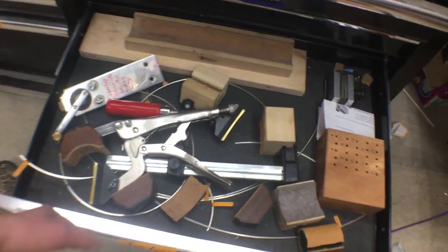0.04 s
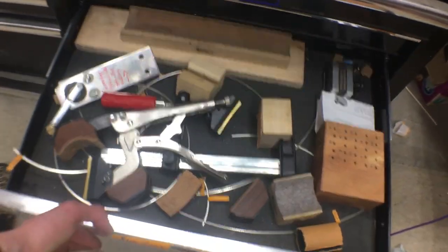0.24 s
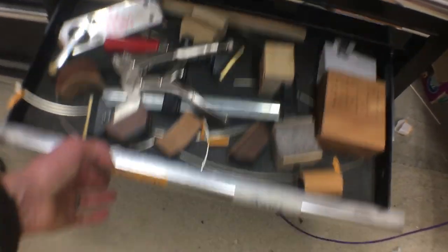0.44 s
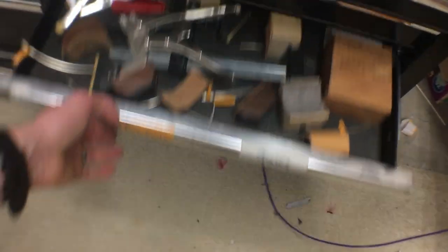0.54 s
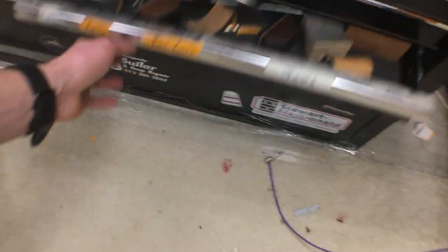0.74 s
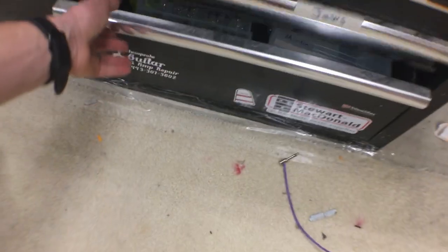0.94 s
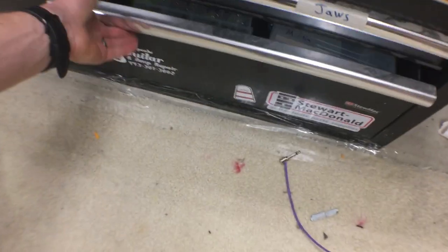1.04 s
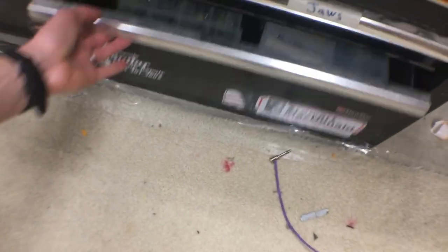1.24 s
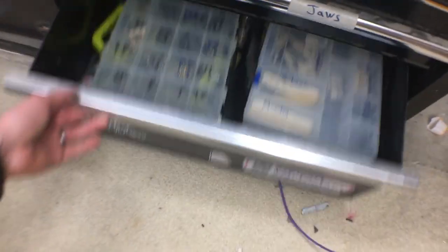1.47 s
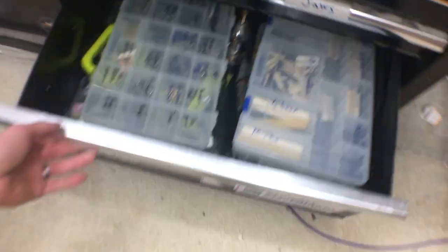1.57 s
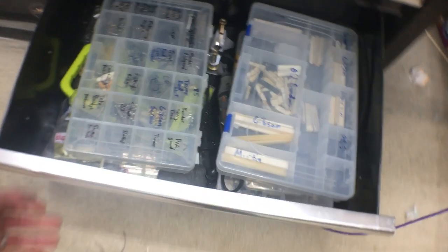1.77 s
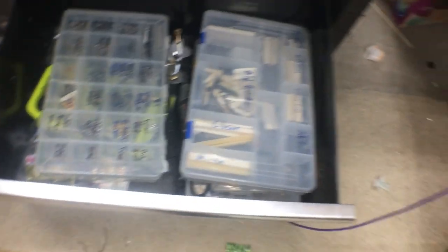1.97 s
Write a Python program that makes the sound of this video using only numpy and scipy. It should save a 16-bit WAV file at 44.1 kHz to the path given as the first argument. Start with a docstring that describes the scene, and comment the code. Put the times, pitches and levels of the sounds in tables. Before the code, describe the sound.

A steel tool-chest drawer rolls shut with a booming thunk and a clatter of loose contents. Another drawer is pulled open, rattling on its slides and knocking against its stop, heard up close in a faintly humming workshop.

```python
"""Steel tool-chest drawers

One drawer is pushed shut on its ball slides and thunks home; the one below is pulled open to its stop.
Each jolt booms in the cabinet panels and shakes a clatter out of slides and contents: dense clicks
that crackle and ring the sheet steel. Loose parts tick, the balls rumble and rattle, the workshop hums."""
import sys
import numpy as np
from scipy import signal
from scipy.fft import rfft, irfft
from scipy.io import wavfile
from scipy.ndimage import uniform_filter1d

SR = 44100
rng = np.random.default_rng(int(sys.argv[2]) if len(sys.argv) > 2 else 0)


def dump_mix(stems):
    """Bounce the given channels to the path in sys.argv[1] as a 16-bit WAV at rate SR."""
    frames = np.atleast_2d(stems).T  # one column per channel
    limited = np.clip(frames, -1, 1)  # hard clip at full scale
    pcm = np.round(limited * 32767).astype(np.int16)
    wavfile.write(sys.argv[1], SR, pcm)


N = 88596

# The cabinet panels' low modes. Each row: pitch in Hz, gain in dB, ring time (T60) in seconds.
PANEL_MODES = [(42.8, -7.5, 0.38), (59.35, -4.5, 0.87), (74.15, -4.5, 0.17), (101.6, -8, 0.37),
               (120.8, 2.5, 0.14), (151, -4, 0.19), (165.9, 2, 0.18), (191.8, 2.5, 0.15), (252.4, -4, 0.14),
               (262.4, -11.5, 0.3)]


def amp(db):
    """Decibels to linear gain."""
    return 10 ** (np.asarray(db, float) / 20)


def unit(x):
    """Scale to an RMS of 1."""
    return x / np.sqrt(np.mean(x ** 2))


def band(x, lo_hz, hi_hz):
    """Gentle band-pass."""
    return signal.sosfilt(signal.butter(2, [lo_hz, hi_hz], "bandpass", fs=SR, output="sos"), x)


def colour(x, eq):
    """EQ a signal along a curve of (Hz, dB) points."""
    hz, db = np.array(eq, float).T
    bin_hz = np.maximum(np.arange(len(x) // 2 + 1) * SR / len(x), 1)
    return irfft(rfft(x) * amp(np.interp(np.log(bin_hz), np.log(hz), db)), len(x))


def ring(x, modes):
    """Damped resonances struck by x, summed in alternating polarity."""
    out = 0
    for k, (hz, db, t60) in enumerate(modes):
        pole = np.exp(2j * np.pi * hz / SR - np.log(1000) / (t60 * SR))
        out += (-1) ** k * amp(db) * signal.lfilter([1], [1, -pole], x).imag
    return out


def clicks(per_s, spread_db):
    """Tiny contacts: random clicks of uneven size, at an RMS of 1."""
    hits = rng.random(N) < per_s / SR
    return unit(hits * rng.standard_normal(N) * amp(spread_db * rng.exponential(size=N)))


def cabinet_booms():
    """Each jolt booms in the panels; where it lands decides which of them ring most."""
    # Each row: start in seconds, level in dB, favoured pitch in Hz.
    jolts = [(0.099, -36.5, 116), (0.409, -35, 193), (0.479, -32.5, 183), (0.506, -35.5, 153),
             (0.541, -35.5, 247), (0.659, -13.5, 137.2), (0.673, -23, 250), (0.683, -11, 82.5),
             (.731, -23.5, 104), (0.798, -16.5, 80), (0.892, -11, 89.2), (0.973, -9.5, 167.5),
             (0.992, -8.5, 72.3), (1.047, -19, 166), (1.113, -16.5, 105.6), (1.163, -14, 80),
             (1.225, -35.5, 170), (1.289, -19.5, 74), (1.431, -25, 200), (1.586, -10.5, 174),
             (1.601, -14.5, 76), (1.661, -15.5, 103.4), (1.699, -19.5, 137.6), (1.716, -14, 74.7),
             (1.820, -28.5, 107.5), (1.953, -31, 64.5)]
    focus_oct, rise_cycles = 0.075, 1.02
    age, out = np.arange(SR // 2) / SR, np.zeros(N)
    for start, db, favoured_hz in jolts:
        i = int(start * SR)
        for hz, gain_db, t60 in PANEL_MODES:
            off_pitch_db = (np.log2(hz / favoured_hz) / focus_oct) ** 2
            attack = 1 - np.exp(-(age * hz / rise_cycles) ** 2)
            decay = amp(db + gain_db - off_pitch_db - 60 * age / t60)
            boom = attack * decay * np.sin(2 * np.pi * hz * age)
            out[i:i + len(age)] -= boom[:N - i]
    return out


def sheet_steel(contacts, envelope, crackle_eq, ring_share):
    """Clicks hit the drawer: a share of the power rings its sheet steel, the rest is broad crackle."""
    # Each row: pitch in Hz, gain in dB, ring time (T60) in seconds.
    sheet_modes = [(356, 4, 0.072), (408.4, 1.5, 0.054), (435, 16.5, 0.023), (481, 7.5, 0.081),
                   (670, -5.5, 0.027), (744, 1, 0.065), (970, 6, 0.0098), (1144, -5, 0.073),
                   (1410, -1.5, 0.017), (1483, -4.5, .05)]
    drive = contacts * envelope
    ringing = ring(drive, sheet_modes) / np.std(ring(contacts, sheet_modes))
    crackle = colour(drive, crackle_eq) / np.std(colour(contacts, crackle_eq))
    return np.sqrt(ring_share) * ringing + np.sqrt(1 - ring_share) * crackle


def clatter():
    """Shaken slides and contents: bursts of dense clicks with a quick attack and an exponential decay."""
    # Each row: start in seconds, body, mid, treble and top levels in dB, attack in ms, T60 in seconds.
    bursts = [(0.477, -31, -38.5, -50, -77, 5.2, 0.066), (0.650, -26, -28.5, -34.5, -42.5, 6, 0.13),
              (0.67, -24, -41, -44.5, -63, 4.8, 0.082), (0.877, -33, -48, -40, -39.5, 2.3, 0.053),
              (0.965, -33, -11.5, -17, -17.5, 15.9, 0.11), (0.975, -14, -21.5, -29, -40.5, 3.8, 0.12),
              (1.002, -19, -36.5, -33.5, -35, 4, 0.14), (1.042, -31, -41, -46.5, -46, 17, 0.32),
              (1.117, -42.5, -52.5, -57, -72, 4.2, 0.32), (1.249, -41.5, -39, -46, -52, 3.4, 0.21),
              (1.372, -34, -36, -40.5, -48, 3.6, 0.055), (1.431, -43.5, -54, -70, -75, 1.7, 0.17),
              (1.538, -62, -46, -46.5, -80, 6, 0.088), (1.574, -11, -14, -20, -23.5, 22.3, 0.076),
              (1.604, -52.5, -39.5, -40, -44, 2.7, 0.12), (1.659, -25, -23.5, -32.5, -40, 3, 0.1),
              (1.732, -30, -22.5, -28.5, -34, 3.9, 0.044), (1.818, -34.5, -34, -55.5, -47.5, 0.89, 0.064),
              (1.883, -38.5, -31, -37, -41.5, 12.3, 0.055), (1.914, -38, -41.5, -42.5, -49, 7, 0.049)]
    # Body, mid, treble and top bands. Each row: low edge in Hz, high edge in Hz.
    bands = [(260, 800), (800, 2200), (2200, 5000), (5000, 15000)]
    # Tone of the crackle. Each row: frequency in Hz, relative gain in dB.
    crackle_eq = [(200, -18), (300, -1.5), (900, 6), (1500, 4), (2500, 4), (4000, -1), (5000, -19),
                  (7000, -35.5), (9800, -45), (10600, -63.5), (15500, -63)]
    ring_shares = (0.28, 0.28, 0, 0)  # only body and mid ring the steel
    t60_scales = (1, 1, 1, 0.85)  # the top dies sooner
    t, out = np.arange(N) / SR, 0
    contacts = clicks(per_s=16000, spread_db=1.2)
    for k, (lo_hz, hi_hz) in enumerate(bands):
        power = np.zeros(N)
        for start, *band_db, attack_ms, t60 in bursts:
            age = np.maximum(t - start, 0)
            attack = np.minimum(age * 1000 / attack_ms, 1)
            decay = amp(band_db[k] - 60 * age / (t60 * t60_scales[k]))
            power += (attack * decay) ** 2
        out += sheet_steel(band(contacts, lo_hz, hi_hz), np.sqrt(power), crackle_eq, ring_shares[k])
    return out


def loose_parts():
    """Small parts tick and ring with a wandering pitch; the wide ones are a short hiss of many contacts."""
    # Each row: start in seconds, pitch in Hz, wander width in Hz, level in dB, T60 in seconds.
    ticks = [(1.238, 3980, 497, -44, 0.014), (1.267, 1133, 29.6, -25.5, 0.032),
             (1.292, 1213, 30.4, -26.5, 0.011), (1.661, 1525, 30, -27, 0.077),
             (1.661, 1750, 30, -32, 0.053), (1.661, 2226, 39.9, -22.5, 0.025),
             (1.672, 879, 41.8, -25.5, 0.043), (1.709, 3814, 1050, -42.5, 0.081),
             (1.709, 7160, 1200, -57, 0.037), (0.88, 3300, 300, -41.5, 0.052),
             (0.881, 4660, 500, -53, 0.074), (1.719, 6180, 600, -56, 0.062), (0.484, 396, 40, -37, 0.21),
             (.652, 793.5, 126, -25.5, 0.073)]
    attack_ms, out = 0.35, 0
    for start, hz, width_hz, db, t60 in ticks:
        age = np.maximum(np.arange(N) / SR - start, 0)
        wander = unit(uniform_filter1d(rng.standard_normal(N), int(SR / width_hz)))
        phase = 2 * np.pi * np.cumsum((hz + width_hz / 2 * wander) * (age > 0)) / SR
        attack = 1 - np.exp(-age * 1000 / attack_ms)
        out += attack * amp(db - 60 * age / t60) * np.sin(phase)
    return out


def ball_slides():
    """Balls rolling in the slides rumble in the panels and rattle the sheet steel."""
    # Fader moves. Each row: time in seconds, rumble level in dB, rattle level in dB.
    faders = [(0, -76, -57), (.3, -60, -63.5), (.43, -57.5, -51.5), (.6, -55.5, -47.5), (.75, -34.5, -46),
              (0.872, -50.5, -50), (0.959, -31, -48.5), (1.151, -39.5, -89.5), (1.23, -39, -46.5),
              (1.328, -44, -46), (1.449, -46.5, -38.5), (1.569, -44.5, -48), (1.648, -26.5, -35.5),
              (1.85, -46, -99), (2.0, -57, -96)]
    # Tone of the balls' crackle. Each row: frequency in Hz, relative gain in dB.
    crackle_eq = [(150, -20), (250, -9.5), (693, -19.5), (1260, -28), (2040, -58), (2970, -43.5),
                  (9000, -80)]
    t = np.arange(N) / SR
    times, rumble_db, rattle_db = np.array(faders).T
    rumble = unit(ring(rng.standard_normal(N), PANEL_MODES)) * amp(np.interp(t, times, rumble_db))
    balls = band(clicks(per_s=7700, spread_db=0.5), 290, 11000)
    rattle_envelope = amp(np.interp(t, times, rattle_db))
    return rumble + sheet_steel(balls, rattle_envelope, crackle_eq, ring_share=0.043)


def room_reverb(direct):
    """The workshop answers with a short, dull tail of decaying noise."""
    t60, predelay_s = 0.28, 0.006
    t = np.arange(SR // 2) / SR
    tail = band(rng.standard_normal(len(t)), 214, 4800) * amp(-60 * t / t60) * (t > predelay_s)
    return signal.fftconvolve(direct, tail / np.sqrt(np.sum(tail ** 2)))[:N]


def workshop_tone():
    """A steady bed of low humming noise and hiss; faint, wavering whistles swell and fade."""
    # Tone of the bed. Each row: frequency in Hz, relative gain in dB.
    bed_eq = [(15, -47), (25, -2.5), (267, 3.5), (537, -10), (920, -10.5), (1410, -6.5), (1900, -13),
              (3260, -18.5), (4400, -29.5), (4900, -32.5), (15500, -42.5)]
    # Each row: pitch in Hz, bandwidth in Hz, level in dB, crest time and swell half-width in seconds.
    whistles = [(1400, 52, -61, 0.15, 0.12), (3250, 29, -68.5, 0.25, 0.046), (1774, 63, -67.5, 1.96, 0.17)]
    t = np.arange(N) / SR
    out = amp(-53.5) * unit(colour(rng.standard_normal(N), bed_eq))
    for hz, width_hz, db, crest_s, swell_s in whistles:
        swell = amp(db) * np.exp(-((t - crest_s) / swell_s) ** 2)
        out += swell * unit(band(rng.standard_normal(N), hz - width_hz / 2, hz + width_hz / 2))
    return out


def scene():
    """The tool chest up close, with a little reverb, over the workshop's room tone; mono."""
    chest = cabinet_booms() + clatter() + loose_parts() + ball_slides()
    return (chest + amp(-13.5) * room_reverb(chest) + workshop_tone())[None]


def record(dry):
    """A gentle low cut thins the deepest bass; a steep high cut takes off the very top."""
    low_cut = signal.butter(2, 35.3, "highpass", fs=SR, output="sos")
    high_cut = signal.ellip(10, 0.2, 80, 15550, fs=SR, output="sos")
    return signal.sosfilt(high_cut, signal.sosfilt(low_cut, dry))


dry = scene()
out = record(dry)
dump_mix(out)
```